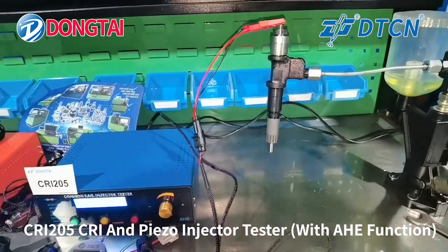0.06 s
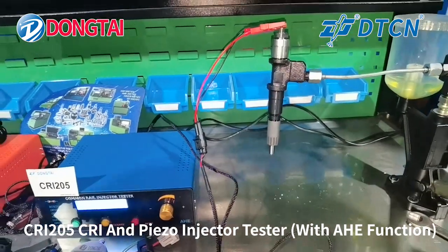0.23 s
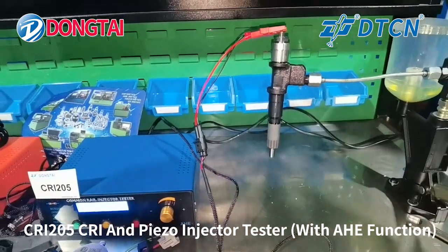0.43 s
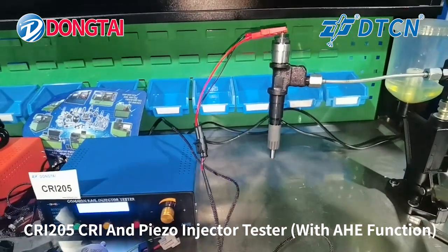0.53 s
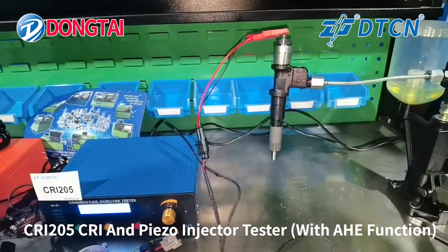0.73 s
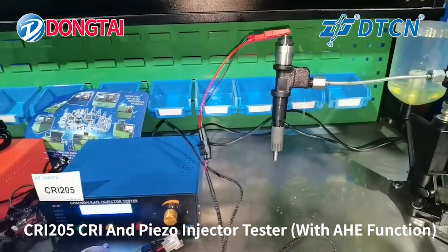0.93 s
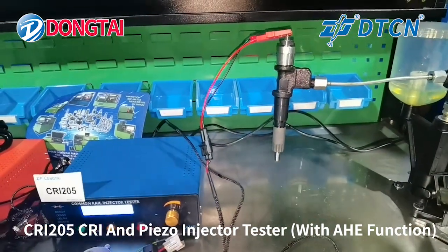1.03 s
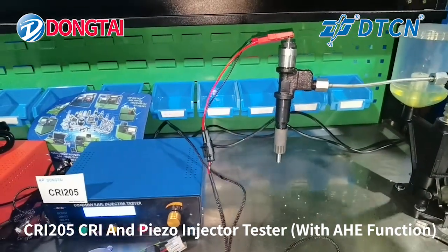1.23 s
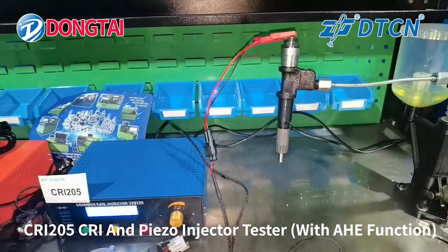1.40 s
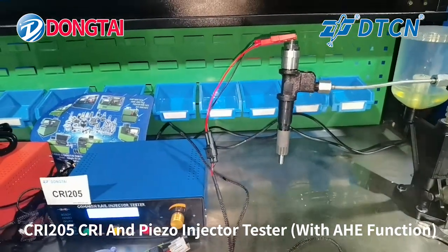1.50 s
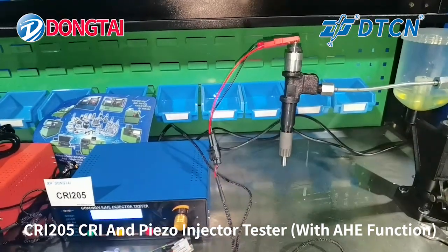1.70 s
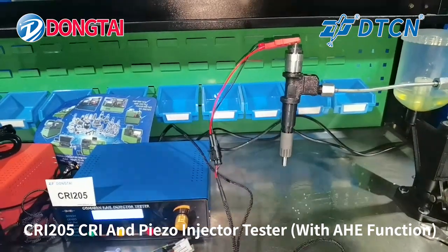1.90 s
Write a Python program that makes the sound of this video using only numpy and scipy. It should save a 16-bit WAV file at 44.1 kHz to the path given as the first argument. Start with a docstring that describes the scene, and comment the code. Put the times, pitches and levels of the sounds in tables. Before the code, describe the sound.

A fuel injector ticks about 17 times a second, each tick a metallic clack and ring. It swells until 0.4 seconds, drops after 0.8 and is faint from 1.3 on. At 0.2 seconds a sharp microphone bump, the loudest moment, leaves a soft thud. Around 1.1 to 1.3 seconds an object knocks and scuffs on the bench. Quiet workshop rumble, hiss and a thin electrical whine continue underneath.

```python
"""Fuel injector on a test bench

A fuel injector fires 17 times a second in a workshop. Each firing is a short metallic ring and rattle
plus a lower clack. The clack swells and fades over the run, and late on the ticking is faint.
Something bumps the microphone early on; later an object knocks and scuffs on the bench.
Behind it all are the rumble and hiss of the room and a thin electrical whine."""
import sys
import numpy as np
from scipy import signal
from scipy.fft import rfft, irfft
from scipy.io import wavfile
from scipy.ndimage import uniform_filter1d

SR = 44100
rng = np.random.default_rng(int(sys.argv[2]) if len(sys.argv) > 2 else 0)


def dump(signal):
    """Clip the signal to [-1, 1] and save it as 16-bit WAV at the path in sys.argv[1]."""
    limited = np.clip(np.atleast_2d(signal).T, -1, 1)
    pcm = np.round(limited * 32767).astype(np.int16)
    wavfile.write(sys.argv[1], SR, pcm)


N = 85995
HIT_SAMPLES = 16384  # length of one hit with its tail

# How strong the firings are as time goes on. Each row: time in seconds, then the levels in dB
# of the clack, the rattle, the steel ring and the higher steel ring.
FIRING_LEVELS = [(.013, -58, -74, -69, -73.5), (.072, -59, -66, -61.5, -60.5),
                 (.131, -51, -60.5, -61.5, -57), (.249, -47, -55.5, -60, -55.5),
                 (.425, -42.5, -49.5, -59.5, -55.5), (.484, -43.5, -52.5, -61, -60.5),
                 (.602, -44, -51.5, -63, -67), (.72, -44.5, -53.5, -63, -65),
                 (.779, -50, -52, -59.5, -62.5), (.837, -60.5, -62.5, -61.5, -61.5),
                 (.955, -63.5, -66, -62, -62), (1.073, -66, -69, -62, -61), (1.132, -56, -66.5, -55, -62.5),
                 (1.191, -55, -66.5, -62, -66), (1.31, -67, -73, -64, -74), (1.485, -70, -77, -69, -79),
                 (1.66, -75, -80, -71.5, -83), (1.897, -76, -81, -72.5, -82)]
# The tone of the low clack. Each row: frequency in Hz, level in dB.
CLACK_TONE = [(100, -15), (260, -7.5), (400, -4.5), (540, -.5), (790, -4.5), (980, 0), (1330, -6),
              (1620, .5), (2150, -7), (2700, -28.5), (5000, -52)]
# The tone of the mid rattle. Each row: frequency in Hz, level in dB.
RATTLE_TONE = [(1200, -28), (2250, -4), (3000, 0), (3550, -2), (3950, -15), (4350, -6.5), (4750, -9),
               (5200, -6.5), (5600, -12.5), (6300, -12), (7300, -17), (7800, -25), (15000, -32)]
# The tone of the steel ring near 6 kHz. Each row: frequency in Hz, level in dB.
RING_TONE = [(2200, -34), (2780, -10), (2920, -17), (3070, -9), (3450, -24), (4400, -17), (5500, -27),
             (5850, -4.5), (6100, -6), (6400, 0), (6700, -4), (7100, -20), (10000, -35.5)]
# The tone of the higher steel ring near 7 kHz. Each row: frequency in Hz, level in dB.
HIGH_RING_TONE = [(4000, -39), (6600, -21), (6950, -5), (7150, -1.5), (7290, -3), (7480, -22), (10000, -40)]


def injector():
    """Every firing is a small blow that makes the metal clack, rattle and ring."""
    times, clack_db, rattle_db, ring_db, high_ring_db = np.transpose(FIRING_LEVELS)
    # Each shape: rise in seconds, fade in seconds, tail level in dB, tail fade in seconds.
    clack_shape = (.004, .045, -10.5, .3)
    rattle_shape = (.004, .075, -7, .26)
    ring_shape = (.0016, .038, -12, .22)
    high_ring_shape = (.0012, .035, -14.5, .2)
    return (firings(times, clack_db, CLACK_TONE, clack_shape, variety=.31, jitter=.1)
            + firings(times, rattle_db, RATTLE_TONE, rattle_shape, variety=.4, jitter=.5)
            + firings(times, ring_db, RING_TONE, ring_shape, variety=.41, jitter=1.9)
            + firings(times, high_ring_db, HIGH_RING_TONE, high_ring_shape, variety=.3, jitter=.5))


# The pitches at which the injector and its stand ring.
# Each row: frequency in Hz, width in Hz, boost in dB.
METAL_RESONANCES = [(392, 30, 6), (555, 48, 7), (697, 32, 6), (1022, 55, 8), (1147, 25, 6), (1515, 30, 3),
                    (1600, 30, 4), (1850, 30, 5), (2280, 35.3, 5), (2580, 35, 3), (2970, 70, 4.5),
                    (3365, 30, 6), (3487, 40, 7), (5170, 150, 6.5), (6320, 66, 4.5), (7030, 110, 6.5)]


def firings(level_times, levels_db, tone, shape, variety, jitter, first_s=.0127, period_s=.05888):
    """One tick repeats at every firing; it drifts slowly and varies a little each time."""
    starts = first_s + period_s * np.arange(int(N / SR / period_s))
    early, late, *variants = colour(blows(*shape, count=6), tone, METAL_RESONANCES)
    shared = np.sqrt(1 - variety ** 2)
    out = np.zeros(N)
    for start, (pick, wobble) in zip(starts, rng.random((len(starts), 2))):
        turn = np.pi * start * SR / N
        drifting = np.cos(turn) * early + np.sin(turn) * late
        tick = shared * drifting + variety * variants[int(pick * len(variants))]
        db = np.interp(start, level_times, levels_db) + jitter * (1.9 * wobble - 1.5)
        add(out, start, amp(db) * level_onset(tick))
    return out


# Two snaps on the microphone. Each row: start in seconds, level in dB, width in seconds.
MIC_SNAPS = [(.2308, -35, .00005), (.2418, -11.2, .00042)]
# The tone of a snap. Each row: frequency in Hz, level in dB.
SNAP_TONE = [(300, 1), (1500, 0), (3000, -5), (4400, -4), (5400, -9), (7000, -5), (9000, 0), (11000, 1),
             (13000, -1), (15800, -9)]


def microphone_bump(start_s=.2317, rise_s=.0012, fall_s=.0092, push_db=-6, low_cut_hz=8):
    """A push of pressure between two snaps; cutting the deepest bass makes it swing back past zero."""
    t = np.arange(N) / SR
    rise = np.sin(np.pi / 2 * np.clip((t - start_s) / rise_s, 0, 1)) ** 2
    fall = np.clip(1 - (t - start_s - rise_s) / fall_s, 0, 1) ** 1.55
    pressure = amp(push_db) * rise * fall
    for start, db, width_s in MIC_SNAPS:
        pulse = np.clip(width_s * SR - np.arange(1024), 0, 1)
        add(pressure, start, amp(db) * colour(pulse, SNAP_TONE))
    return signal.lfilter(*signal.butter(1, low_cut_hz, "highpass", fs=SR), pressure)


# Knocks and scuffs on the bench.
# Each row: start in seconds, level in dB, rise in seconds, seconds to fade by 60 dB.
BENCH_KNOCKS = [(.823, -55, .004, .06), (1.1032, -38.8, 0.0011, .045), (1.115, -48.5, 0.0018, 0.054),
                (1.131, -51, 0.0018, .05), (1.185, -52.5, 0.0017, .07), (1.1902, -49.5, 0.00088, .07),
                (1.204, -50, .004, .1), (1.217, -52, .002, 0.13), (1.240, -50, .004, .08)]
# The tone of the knocked object. Each row: frequency in Hz, level in dB.
OBJECT_TONE = [(80, -20), (250, -13), (450, -7), (720, 1), (1120, 1), (1330, -4), (1580, -3), (1900, -15),
               (2500, -24), (3300, -24), (3800, -28), (4250, -20), (5200, -29), (6500, -25), (8000, -40),
               (15000, -48)]


def bench_knocks():
    """An object knocks on the bench, scuffs and settles in a string of short blows."""
    out = np.zeros(N)
    for start, db, rise_s, fade_s in BENCH_KNOCKS:
        blow = blows(rise_s, fade_s, tail_db=-13, tail_fade_s=.36)[0]
        add(out, start, amp(db) * level_onset(colour(blow, OBJECT_TONE)))
    return out


# Soft low thuds. Each row: start in seconds, level in dB, rise in seconds, seconds to fade by 60 dB.
SOFT_THUDS = [(.25, -51, 0.018, 0.91), (.37, -56, .015, .7), (1.19, -55, .02, .5), (1.245, -54.5, .015, .6)]
# The tone of a thud. Each row: frequency in Hz, level in dB.
THUD_TONE = [(30, -1), (140, -2), (260, -.5), (480, -2), (800, -11), (2500, -39.5)]


def soft_thuds():
    """Deep noise swells and dies away, after the bump and as the object settles."""
    out, t = np.zeros(N), np.arange(HIT_SAMPLES) / SR
    for start, db, rise_s, fade_s in SOFT_THUDS:
        loudness = np.minimum(t / rise_s, 1) * amp(db - 60 * t / fade_s)
        rumble = unit(colour(rng.standard_normal(HIT_SAMPLES), THUD_TONE))
        add(out, start, loudness * rumble)
    return out


# The tone of the workshop's background noise. Each row: frequency in Hz, level in dB.
ROOM_TONE = [(20, -3), (50, -4), (137, -4), (300, -10), (550, -14), (1150, -18), (2260, -25), (3100, -24.5),
             (3600, -27.5), (4450, -24), (5370, -30.5), (6300, -27.5), (7300, -29.5), (9200, -21),
             (12700, -21.5), (14200, -28.5), (15800, -30)]


def room_noise(start_db=-61.6, fade_db_per_s=1.4):
    """The room's rumble and hiss ease off slowly."""
    t = np.arange(N) / SR
    gains = amp(tone_db(ROOM_TONE, np.fft.rfftfreq(N, 1 / SR)))
    air = irfft(rfft(rng.standard_normal(N)) * gains, N)
    return amp(start_db - fade_db_per_s * t) * unit(air)


def electrical_whine(hz=4480, db=-83):
    """One thin, steady, high note."""
    t = np.arange(N) / SR
    return amp(db) * unit(np.sin(2 * np.pi * hz * t))


def blows(rise_s, fade_s, tail_db, tail_fade_s, first=.35, count=1, size=4096):
    """A blow's crowded echoes start abruptly, swell and die, leaving a room tail. Fades are by 60 dB."""
    t = np.arange(HIT_SAMPLES) / SR
    since_peak = np.maximum(t - rise_s, 0)
    rise = first + (1 - first) * np.minimum(t / rise_s, 1)
    fade = amp(-60 * since_peak / fade_s)
    loudness = (rise * fade)[:size] + 1e-9
    burst = loudness * rng.standard_normal((count, size))
    for _ in range(2):  # even out chance peaks, first in tone and then in loudness
        spectrum = rfft(burst)
        burst = irfft(spectrum / (abs(spectrum) + 1e-12))
        power = abs(uniform_filter1d(burst ** 2, size=90))
        burst = loudness * burst / np.sqrt(power + 1e-20)
    tail_loudness = (1 - fade) * amp(tail_db - 60 * since_peak / tail_fade_s)
    out = tail_loudness * rng.standard_normal((count, HIT_SAMPLES))
    out[:, :size] += burst
    return out


def colour(sound, tone, resonances=()):
    """Filters a hit so that it takes on a tone and rings at the given resonances."""
    hz = np.fft.rfftfreq(HIT_SAMPLES, 1 / SR)
    peaks_db = sum(boost / (1 + (2 * (hz - centre) / width) ** 2) for centre, width, boost in resonances)
    cepstrum = irfft(np.log(amp(tone_db(tone, hz) + peaks_db)))
    # Folding onto the first half makes the ringing come after the hit, never before it.
    cepstrum[1:HIT_SAMPLES // 2] *= 2
    cepstrum[HIT_SAMPLES // 2 + 1:] = 0
    return irfft(np.exp(rfft(cepstrum)) * rfft(sound, HIT_SAMPLES))


def tone_db(tone, hz):
    """Reads levels between the rows of a tone table, with octaves evenly spaced."""
    row_hz, row_db = np.transpose(tone)
    return np.interp(np.log(hz + 1), np.log(row_hz), row_db)


def amp(db):
    """Turns decibels into a volume factor."""
    return 10 ** (np.asarray(db) / 20)


def unit(sound):
    """Scales a sound to an average strength (rms) of 1."""
    return sound / np.sqrt(np.mean(sound ** 2) + 1e-20)


def level_onset(hit):
    """Scales a hit so that its first 14 ms have an average strength (rms) of 1."""
    return hit / np.sqrt(np.mean(hit[:617] ** 2))


def add(mix, start_s, sound):
    """Mixes a sound in at its start time."""
    part = mix[max(round(start_s * SR), 0):][:len(sound)]
    part += sound[:len(part)]


def scene():
    """All the sounds meet at one microphone."""
    mix = injector() + microphone_bump() + bench_knocks() + soft_thuds()
    return (mix + room_noise() + electrical_whine())[None]


def record(dry):
    """The recorder cuts off the highest treble."""
    treble_cut = signal.firwin(511, cutoff=15900, window=("kaiser", 9), fs=SR)
    return signal.oaconvolve(dry, treble_cut[None], "same")


dry = scene()
out = record(dry)
dump(out)
```